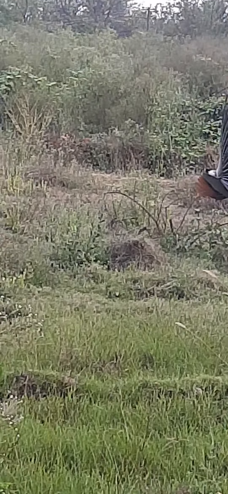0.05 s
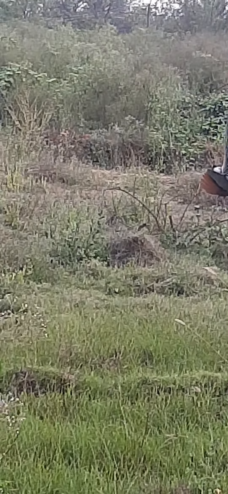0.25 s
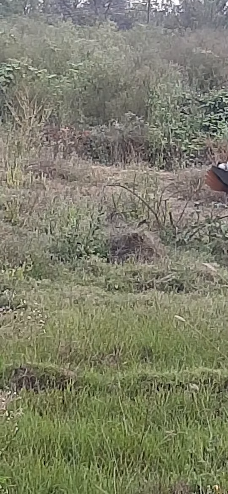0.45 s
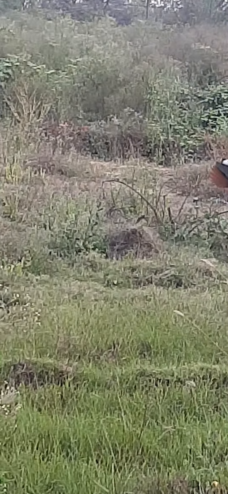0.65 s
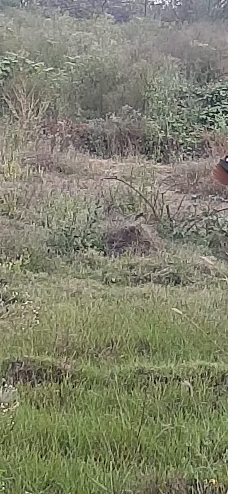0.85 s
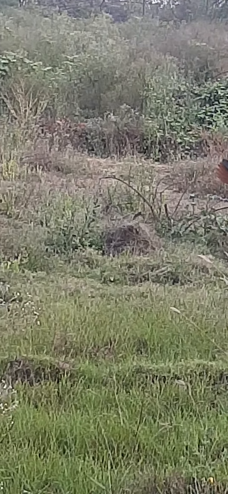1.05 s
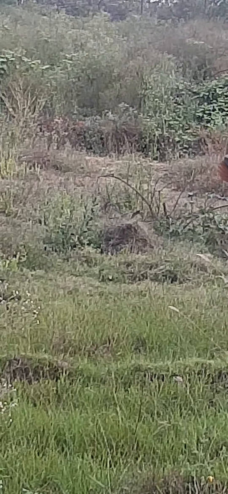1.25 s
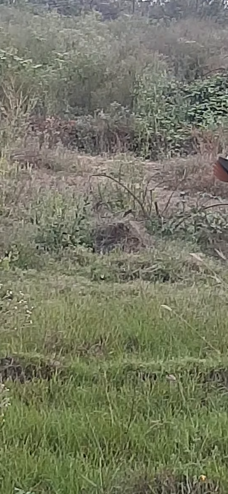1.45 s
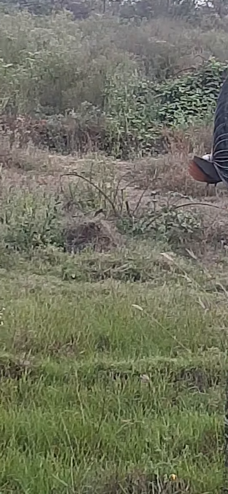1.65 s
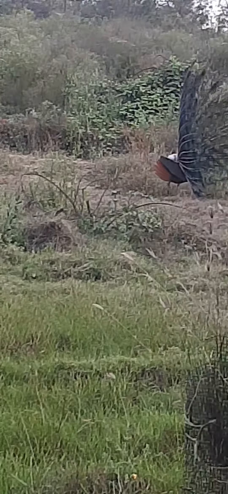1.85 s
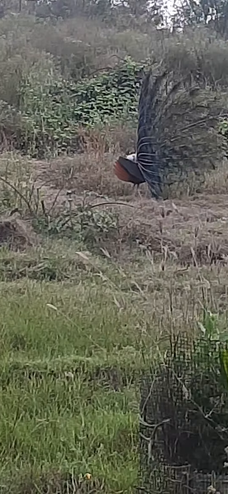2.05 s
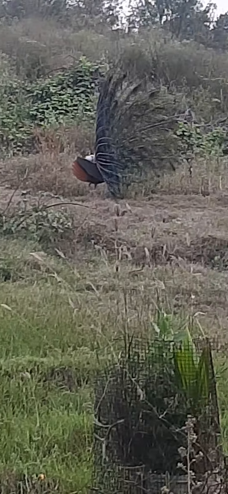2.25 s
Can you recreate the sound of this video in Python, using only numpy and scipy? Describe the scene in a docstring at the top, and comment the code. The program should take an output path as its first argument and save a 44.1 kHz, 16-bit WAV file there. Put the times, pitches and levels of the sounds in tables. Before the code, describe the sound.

Short falling bird chirps and farther whistles sound over gusty wind rumble and soft hiss.

```python
"""An open grassy field with scrub behind it, heard through a stereo microphone.
Nearest, a flock of small birds gives short falling chirps; farther out, birds whistle glides,
call hoarsely, and one gives a low, sinking note. The scrub scatters their near-pure tones.
Gusts buffet the microphone, mostly its left port, over a soft outdoor hiss and a faint high rustle."""
import sys
import numpy as np
from scipy import signal
from scipy.fft import rfft, irfft
from scipy.io import wavfile
from scipy.ndimage import uniform_filter1d

SR = 44100
rng = np.random.default_rng(int(sys.argv[2]) if len(sys.argv) > 2 else 0)


def int16_out(signal):
    """Quantize to a 16-bit WAV file."""
    q = np.round(np.clip(np.atleast_2d(signal).T, -1, 1) * 32767)
    wavfile.write(sys.argv[1], SR, q.astype(np.int16))


N = 105840
TIME = np.arange(N) / SR
SIDE = np.array([[.5], [-.5]])  # each port's share of a left-right offset


def amp(db):
    """Decibels to gain."""
    return 10 ** (np.asarray(db) / 20)


def unit(x):
    """Scales to rms 1."""
    return x / np.sqrt(np.mean(x ** 2) + 1e-20)


def curve(points, t, column=1):
    """Reads one column of a table along time."""
    table = np.transpose(points)
    return np.interp(t, table[0], table[column])


def spectrum(points, hz):
    """Reads a table on a log-frequency axis."""
    f, value = np.transpose(points)
    return np.interp(np.log(hz + 1), np.log(f + 1), value)


def drift(t, rate_hz):
    """Smooth random wander of rms about 1, up to the given rate."""
    speed, phase = rng.random((2, 24, 1))
    return np.sin(2 * np.pi * (rate_hz * speed * t + phase)).sum(0) / np.sqrt(len(speed) / 2)


def fade(t, attack, release):
    """Soft rise, hold, soft fall."""
    rise = np.sin(np.pi / 2 * np.clip(t / attack, 0, 1))
    return rise * np.sin(np.pi / 2 * np.clip((t[-1] - t) / release, 0, 1))


def add(mix, start_s, sound):
    """Mixes a stereo sound in at a time."""
    at = round(start_s * SR)
    sound = sound[:, max(-at, 0):]
    part = mix[:, max(at, 0):][:, :sound.shape[1]]
    part += sound[:, :part.shape[1]]


# The field's background hiss (frequency [Hz], relative density [dB])
AIR_SPECTRUM = [(28, -40.5), (55, 7.5), (120, -2), (250, -8), (390, -11), (550, -16.5), (950, -20.5),
                (1400, -22.5), (2400, -14.5), (4000, -21), (6000, -25.5), (7800, -24), (9000, -33.5),
                (10100, -27), (11800, -40), (15500, -42)]
# Its lean across the microphone (frequency [Hz], left minus right [dB])
AIR_BALANCE = [(60, -1), (700, -2.5), (1300, -6), (4400, -6), (10000, 2.5), (15000, 1)]
# Its likeness at the two ports (frequency [Hz], correlation [0-1])
AIR_COHERENCE = [(50, 1), (600, 0.87), (2500, 0.18), (15000, 0.064)]
# Faint high rustle, on the scale of the hiss (time [s], relative density [dB])
RUSTLE_SWELLS = [(.9, -63), (1.0, -34), (1.3, -37), (1.43, -29), (1.65, -79), (1.9, -35), (2.25, -32.5),
                 (2.4, -43)]
def air(level_db=-52.3, patchy_db=2, rustle_hz=11600, rustle_width_hz=3800):
    """Steady outdoor hiss and a high rustle that swells, in gently shifting patches."""
    frames, hz = N // 256 + 5, np.fft.rfftfreq(1024, 1 / SR)
    real_a, imag_a, real_b, imag_b, patches = rng.standard_normal((5, frames, len(hz)))
    for axis in (0, 1):
        patches = uniform_filter1d(patches, size=12, axis=axis)
    coherence = spectrum(AIR_COHERENCE, hz)
    left = real_a + 1j * imag_a
    right = coherence * left + np.sqrt(1 - coherence ** 2) * (real_b + 1j * imag_b)
    swell = amp(curve(RUSTLE_SWELLS, np.linspace(0, N / SR, frames)))
    rustle = swell[:, None] * np.exp(-((hz - rustle_hz) / rustle_width_hz) ** 2)
    bins = np.array([left, right]) * np.hypot(amp(spectrum(AIR_SPECTRUM, hz)), rustle)
    bins *= amp(patchy_db * unit(patches) + SIDE[:, None] * spectrum(AIR_BALANCE, hz))
    _, hiss = signal.istft(bins.swapaxes(1, 2), nperseg=1024, noverlap=768)
    return amp(level_db) * unit(hiss[:, :N])


# Wind noise on the microphone (frequency [Hz], relative density [dB])
RUMBLE_SPECTRUM = [(20, -40), (32, -26), (48, 1), (68, 4.5), (120, -1), (200, -16), (350, -26.5),
                   (520, -36), (2000, -61.5)]
def rumble(gusts):
    """Turbulence at one port; its strength follows the gusts."""
    colour = amp(spectrum(RUMBLE_SPECTRUM, np.fft.rfftfreq(N, 1 / SR)))
    noise = irfft(rfft(rng.standard_normal(N)) * colour, N)
    steady = noise / np.sqrt(signal.fftconvolve(noise ** 2, np.hanning(SR // 16), "same"))
    return unit(steady) * amp(curve(gusts, TIME))


# Gusts on the windward left port (time [s], level [dB])
LEFT_GUSTS = [(0, -54), (.19, -51), (.24, -32), (.3, -50), (.41, -47), (.455, -31.5), (.5, -45), (.62, -36),
              (.71, -46), (.83, -30.5), (.9, -40), (.945, -28.5), (1.04, -42), (1.19, -31.5), (1.26, -56.5),
              (1.35, -51), (1.39, -29.5), (1.46, -28), (1.52, -51.5), (1.7, -44), (1.93, -50),
              (1.97, -33.5), (2.05, -50.5), (2.4, -54.5)]
# Gusts on the sheltered right port (time [s], level [dB])
RIGHT_GUSTS = [(.34, -52), (.41, -34.5), (.49, -64), (.9, -40), (1.3, -74)]
# Eddies striking the left port (time [s], width [s], peak before the high-pass [dB])
EDDIES = [(0.456, 0.0014, -18), (0.776, 0.00082, -24.5), (0.844, 0.00097, -10), (0.946, 0.0015, -18.5),
          (1.171, 0.0016, -12.5), (1.421, 0.00083, -19.5), (1.458, 0.00084, -14.5)]
def wind(port_highpass_hz=55.7):
    """Rumble on both ports; single eddies thump the left one with short suction pulses."""
    suction = sum(-amp(db) * np.exp(-.5 * ((TIME - at) / width) ** 2) for at, width, db in EDDIES)
    thumps = signal.filtfilt(*signal.butter(3, port_highpass_hz, "high", fs=SR), suction)
    return np.array([rumble(LEFT_GUSTS) + thumps, rumble(RIGHT_GUSTS)])


def scrub(x, wet_db, early_t60=.11, late_t60=1.2, late_db=-8):
    """Adds quick scatter from near bushes and a faint long tail."""
    t = np.arange(SR // 2) / SR
    decay = amp(-60 * t / early_t60) + amp(late_db - 60 * t / late_t60)
    onset = np.minimum(t / .0066, 1)
    taps = rng.standard_normal((2, len(t))) * decay * onset
    taps *= rng.random(taps.shape) < .15  # sparse reflections
    taps /= np.linalg.norm(taps, axis=1, keepdims=True)
    return x + amp(wet_db) * signal.fftconvolve(x, taps, axes=1)[:, :N]


def syrinx(hz, level, pan_db=0, lead_s=.00005, octave_db=-39):
    """A bird's near-pure tone, reaching the left port slightly sooner."""
    phase = 2 * np.pi * (np.cumsum(hz) / SR + SIDE * lead_s * hz)
    tone = np.sin(phase) + amp(octave_db) * np.sin(2 * phase)
    return np.sqrt(2) * level * amp(SIDE * pan_db) * tone


# One bird's low, sinking call (time [s], pitch [Hz], level [dB])
LOW_CALL = [(.01, 769, -61), (.08, 803, -61), (.25, 777, -63), (.42, 747, -65.5), (.82, 598, -73)]
# A long rising whistle beyond the flock (time [s], pitch [Hz], level [dB])
LONG_WHISTLE = [(.56, 2900, -58), (.61, 3420, -59), (.67, 4030, -54.5), (.72, 4185, -51.5),
                (.78, 4237, -52), (.84, 4174, -50.5), (.865, 4080, -55)]
def held_call(points, waver, flutter_db, wet_db):
    """One drawn-out note that wavers more as it goes on."""
    t = np.arange(points[0][0], points[-1][0], 1 / SR)
    hz = curve(points, t) * (1 + waver * np.linspace(0, 1, len(t)) * drift(t, 91.1))
    db = curve(points, t, column=2) + flutter_db * drift(t, 40.26)
    level = fade(t - t[0], attack=.0088, release=.0044) * amp(db)
    out = np.zeros((2, N))
    add(out, t[0], syrinx(hz, level))
    return scrub(out, wet_db)


# Hoarse calls from far off
# (start [s], length [s], first pitch [Hz], middle pitch [Hz], last pitch [Hz], level [dB])
FAR_CALLS = [(-.01, 0.13, 2704, 2580, 2750, -68.5), (.13, 0.16, 2550, 2487, 2133, -60),
             (.32, 0.061, 2110, 2020, 1620, -65), (.495, 0.048, 1960, 2388, 2160, -59),
             (.512, 0.12, 2700, 2567, 2664, -58.5), (.51, 0.088, 7920, 7410, 6860, -60),
             (.715, 0.1, 2460, 2490, 2043, -59.5), (.862, 0.05, 2444, 2370, 2030, -54),
             (1.05, 0.17, 2000, 1820, 1660, -66), (1.48, 0.056, 2270, 2004, 1920, -62.5)]
# Clear whistles beyond the flock
# (start [s], length [s], first pitch [Hz], middle pitch [Hz], last pitch [Hz], level [dB])
WHISTLES = [(-.02, .17, 6100, 5200, 4710, -62), (.135, 0.059, 5220, 5070, 4800, -60),
            (.29, 0.026, 4210, 4080, 3780, -54.5), (.338, 0.044, 3680, 4550, 4300, -62),
            (.728, 0.044, 4200, 4820, 4300, -57), (1.035, .082, 3680, 3430, 3480, -54),
            (1.39, 0.066, 7950, 7480, 7180, -56.5), (1.518, 0.038, 4900, 4900, 4920, -58),
            (1.606, 0.041, 4840, 5040, 4800, -62), (1.670, 0.039, 4970, 5170, 4630, -62),
            (1.765, 0.069, 3470, 3660, 4160, -58), (1.845, 0.017, 5900, 6860, 7260, -58),
            (1.86, 0.16, 4950, 5360, 5550, -67.5), (2.11, 0.14, 8300, 7380, 6720, -62)]
def glides(notes, waver, flutter_db, wet_db, pan_db):
    """Whistled notes that bend in one arc; more waver and flutter make them hoarser."""
    out = np.zeros((2, N))
    for start, length, first_hz, middle_hz, last_hz, db in notes:
        t = np.arange(0, length, 1 / SR)
        arc = np.polyfit([0, .5, 1], [first_hz, middle_hz, last_hz], 2)
        level = fade(t, attack=.0088, release=.0044) * amp(db + flutter_db * drift(t, 44.7))
        hz = np.polyval(arc, t / length) * (1 + waver * drift(t, 152.7))
        add(out, start, syrinx(hz, level, pan_db))
    return scrub(out, wet_db)


def grass(x, wet_db=-6.5, t60=.016):
    """Stems around one bird smear its note by a few milliseconds, differently at each port."""
    t = np.arange(0, t60, 1 / SR)
    taps = rng.standard_normal((2, len(t))) * amp(-60 * t / t60)
    taps *= amp(wet_db) / np.linalg.norm(taps, axis=1, keepdims=True)
    taps[:, 0] = 1  # direct path
    return signal.fftconvolve(x, taps, axes=1) / np.hypot(1, amp(wet_db))


# The flock, nearest the microphone
# (time of the top [s], top pitch [Hz], mid-fall level [dB], left minus right [dB])
CHIRPS = [(0.229, 4510, -48.5, 7.5), (0.588, 4203, -44, -1.5), (0.977, 4258, -38.5, 7.5),
          (.983, 4120, -42, -10.5), (1.203, 4307, -42, 0), (1.358, 4240, -41.5, 6), (1.363, 4212, -40, -1),
          (1.479, 3890, -39, 4), (1.532, 4264, -44, 4), (1.607, 4160, -49.5, -0.5), (1.647, 3880, -45, 2.5),
          (1.659, 3890, -37.5, -1), (1.667, 3920, -46, -2.5), (1.895, 4270, -40, 2.5),
          (1.911, 3945, -39, -3.5), (1.962, 4070, -48, -5), (2.01, 4050, -51, 4.5),
          (2.202, 4132, -38.5, 1.5), (2.24, 3980, -42.5, -6.5), (2.266, 3985, -47, -3),
          (2.322, 3945, -48.5, -1)]
# A chirp's downward slide (share of the fall time [0-1], share of the drop [0-1])
CHIRP_FALL = [(0, 0.022), (.14, 0.03), (.48, 0.614), (.8, .83), (1, 1)]
def chirps(rise_s=.007, fall_s=.033, ends_db=-4):
    """Each chirp flicks up to its top, then slides down, loudest halfway through the drop."""
    scoop, drop, waver = .1916, .385, .023  # shares of the pitch
    out = np.zeros((2, N))
    for top_s, top_hz, db, pan_db in CHIRPS:
        t = np.arange(0, rise_s + fall_s, 1 / SR)
        rise_to_go = np.maximum(1 - t / rise_s, 0) ** 2
        fall = uniform_filter1d(curve(CHIRP_FALL, (t - rise_s) / fall_s), size=120)
        hz = top_hz * (1 - scoop * rise_to_go - drop * fall)
        hz *= 1 + waver * drift(t, 249.6)
        level = fade(t, attack=rise_s, release=.002) * amp(db + ends_db * (1 - 2 * fall) ** 2)
        add(out, top_s - rise_s, grass(syrinx(hz, level, pan_db, lead_s=.00016)))
    return scrub(out, wet_db=-7.5)


def scene():
    """The flock in front, farther birds mostly to the right, wind on the microphone and air all round."""
    whistles = glides(WHISTLES, waver=.007, flutter_db=.5, wet_db=-10, pan_db=-4.5)
    far_calls = glides(FAR_CALLS, waver=.02, flutter_db=3, wet_db=-3, pan_db=-7)
    long_whistle = held_call(LONG_WHISTLE, waver=.0022, flutter_db=0, wet_db=-12)
    low_call = held_call(LOW_CALL, waver=.06, flutter_db=5, wet_db=-7)
    return chirps() + whistles + far_calls + long_whistle + low_call + wind() + air()


def record(dry):
    """The recorder's band limit takes off the highest treble."""
    lowpass = signal.firwin(511, cutoff=15700, window=("kaiser", 9), fs=SR)
    return signal.oaconvolve(dry, lowpass[None], "same")


dry = scene()
out = record(dry)
int16_out(out)
```